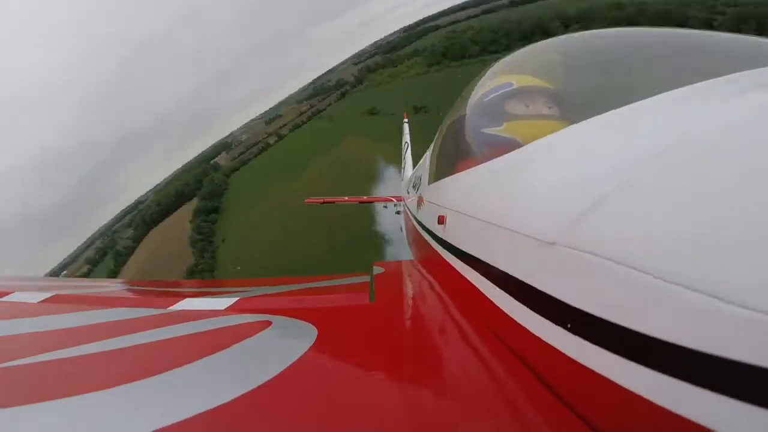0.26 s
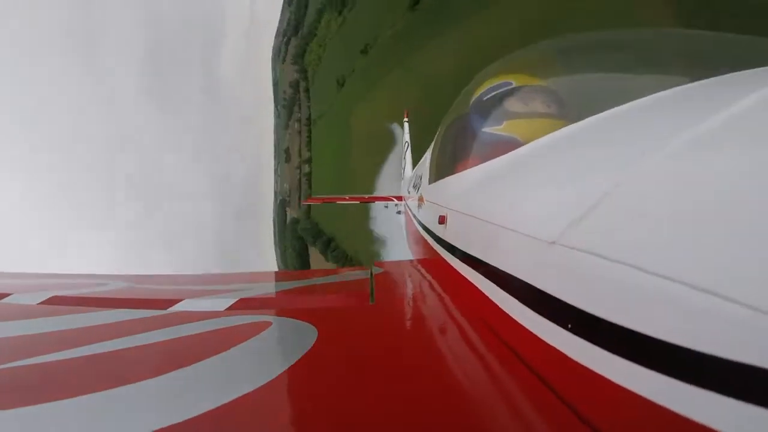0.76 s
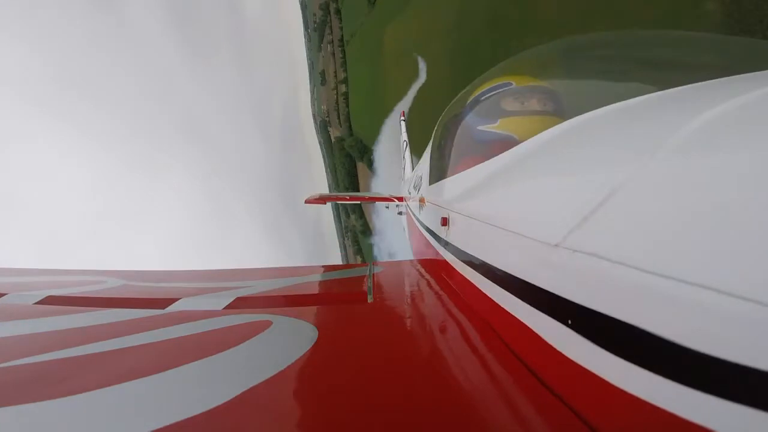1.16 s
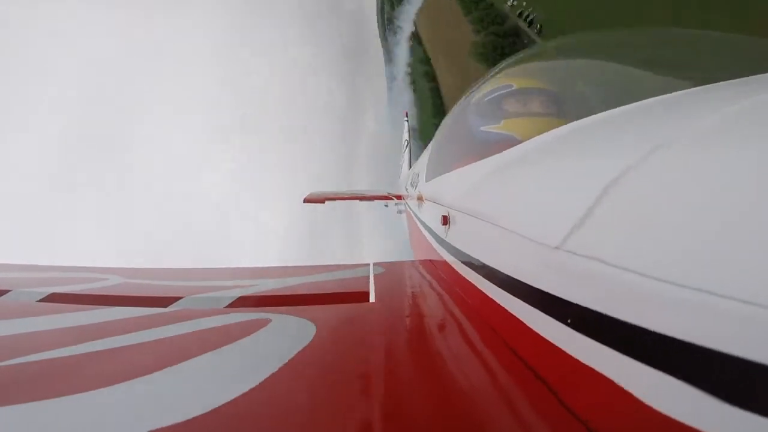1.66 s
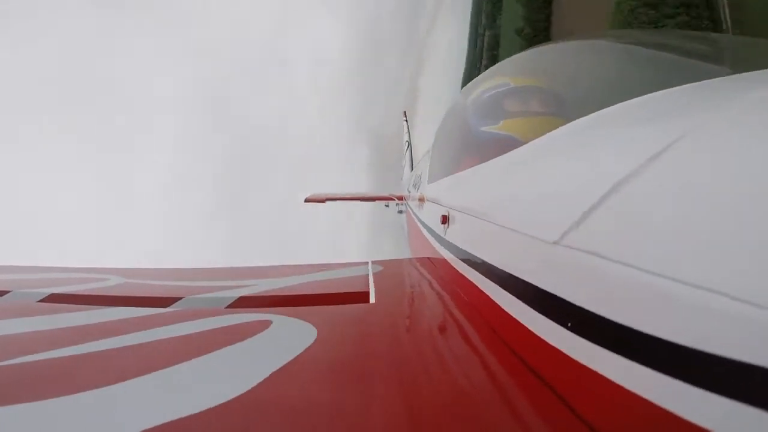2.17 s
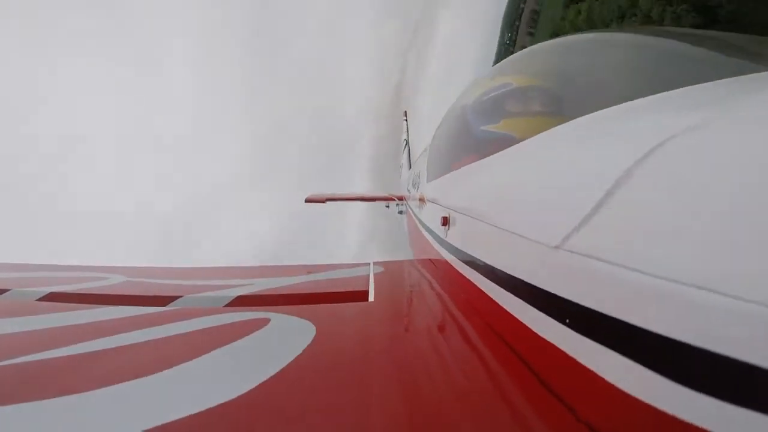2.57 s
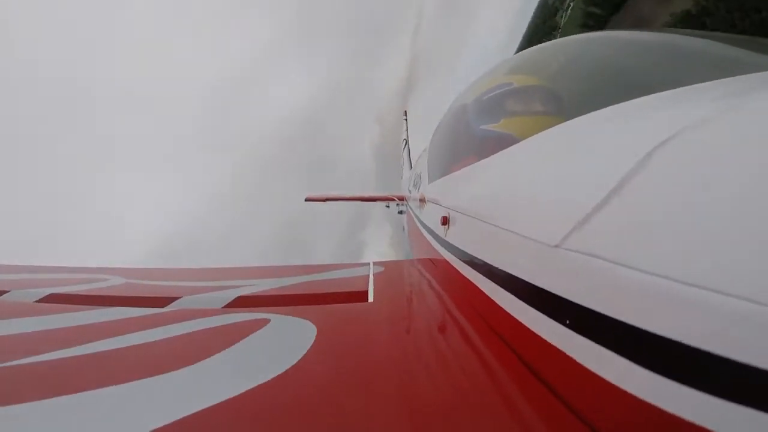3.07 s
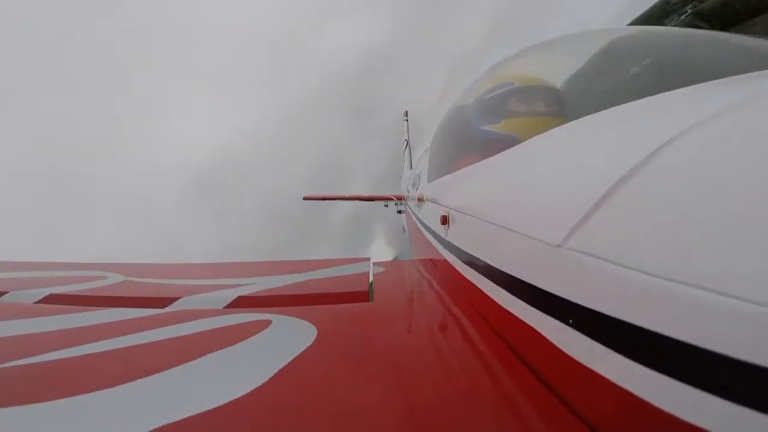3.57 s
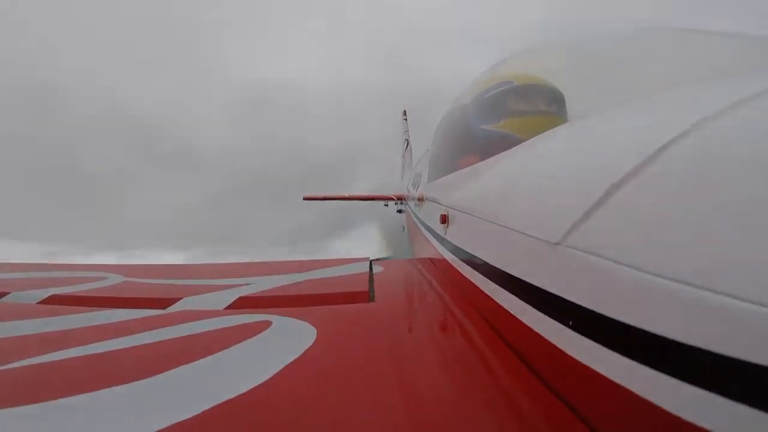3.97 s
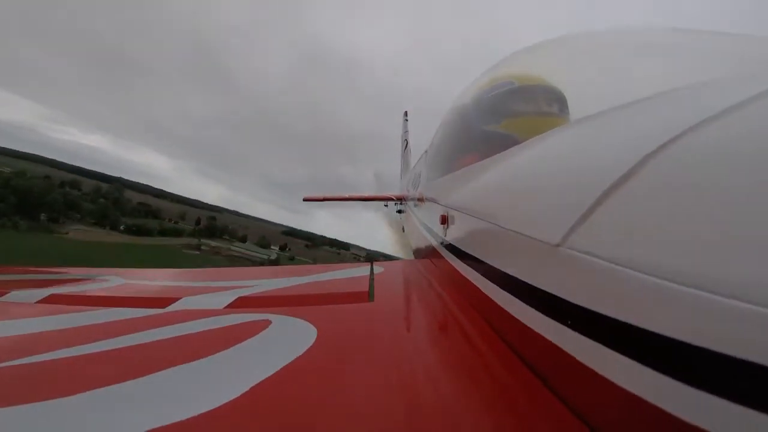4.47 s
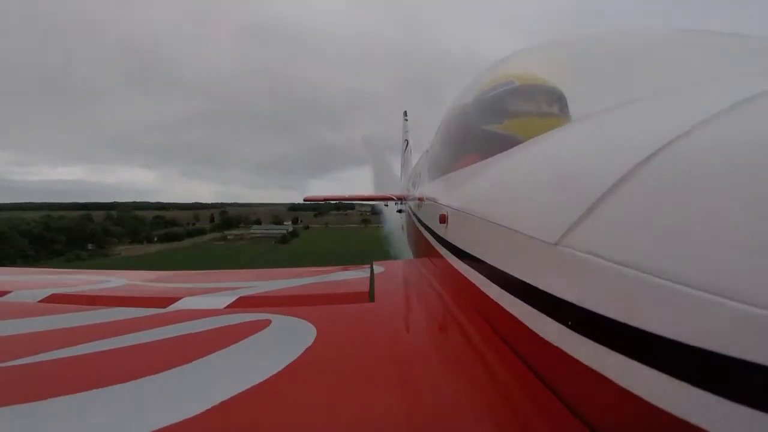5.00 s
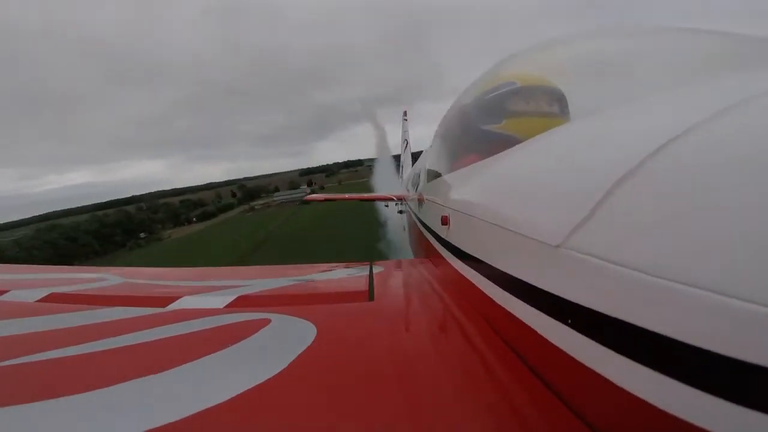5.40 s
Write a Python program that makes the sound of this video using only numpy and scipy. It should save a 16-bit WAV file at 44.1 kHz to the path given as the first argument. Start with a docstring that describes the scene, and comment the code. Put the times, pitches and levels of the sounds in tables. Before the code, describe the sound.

A small propeller plane's petrol engine drones loudly up close, rising slightly in pitch, with wind buffeting and hissing over the microphone.

```python
"""Model aeroplane, heard from the wing

A camera sits in the slipstream of a two-blade propeller on a petrol engine. Each blade throws a
pressure wave and a burst of turbulence over the housing; shaft and firing rate add odd orders.
The airstream buffets the microphone port and hisses in its cavity as speed builds. The housing ticks."""
import sys
import numpy as np
from scipy import signal
from scipy.fft import rfft, irfft, next_fast_len
from scipy.io import wavfile

SR = 44100
rng = np.random.default_rng(int(sys.argv[2]) if len(sys.argv) > 2 else 0)


def pcm_store(signal):
    """Save signal as 16-bit PCM."""
    levels = np.round(np.clip(np.atleast_2d(signal), -1, 1) * 32767)
    wavfile.write(sys.argv[1], SR, levels.astype(np.int16).T)


N = 248724


def amp(db):
    """dB to gain."""
    return 10 ** (np.asarray(db) / 20)


def unit_rms(x):
    """Scale to rms 1."""
    return x / np.sqrt(np.mean(x ** 2) + 1e-20)


def per_sample(rows):
    """Columns of a time table, one value per sample."""
    times_s, *columns = np.transpose(rows)
    return [np.interp(np.arange(N) / SR, times_s, column) for column in columns]


def drift(corner_hz):
    """Slow noise, rms 1, through a double one-pole low-pass."""
    hop, settle = 40, 2000
    pole = np.exp(-2 * np.pi * corner_hz * hop / SR)
    noise = rng.standard_normal(N // hop + settle + 2)
    slow = signal.lfilter([1], [1, -2 * pole, pole * pole], noise)[settle:]
    return np.interp(np.arange(N) / hop, np.arange(len(slow)), unit_rms(slow))


def shaped_noise(spectrum, gate=1):
    """Gated noise shaped by rows of f/Hz, level/dB; rms 1."""
    size = next_fast_len(N)
    hz, db = np.transpose(spectrum)
    log_hz = np.log(np.maximum(np.arange(size // 2 + 1) * SR / size, 1))
    gain = amp(np.interp(log_hz, np.log(hz), db))
    noise = gate * rng.standard_normal(N)
    return unit_rms(irfft(rfft(noise, size) * gain, size)[:N])


def blade_gate(shaft_rad, depth, lag_rad, imbalance_db, scatter_db):
    """One swell per blade pass, each of random strength; one blade is offset by imbalance_db."""
    passes = (shaft_rad - lag_rad) / np.pi
    index = np.floor(passes + 0.5).astype(int)
    strength = amp(scatter_db * rng.standard_normal(2000) + imbalance_db * (np.arange(2000) % 2))
    swell = np.exp(depth * (np.cos(2 * np.pi * passes) - 1))
    return strength[index - index.min()] * swell + np.exp(-2 * depth)


def housing_ticks():
    """Short rings in the housing: one-cycle attack, fast decay."""
    # t/s, level/dB, f/Hz
    ticks = [(.127, -25, 3000), (.265, -30, 2600), (.555, -28, 3000), (2.742, -16, 2200),
             (2.989, -28, 2500), (4.543, -29, 2350), (5.575, -25, 2200)]
    t60_s = 0.0075
    t = np.arange(600) / SR
    out = np.zeros(N + SR)
    for at_s, db, hz in ticks:
        envelope = np.minimum(hz * t, 1) * amp(db - 60 * t / t60_s)
        start = int(at_s * SR)
        out[start:start + len(t)] += envelope * np.sin(2 * np.pi * hz * t)
    return out[:N]


def port_hiss(shaft_rad, hiss_db):
    """Fine turbulence rings the port cavity, pulsed by the slipstream; the top grows faster with speed."""
    # cavity response: f/Hz, level/dB
    cavity_spectrum = [(1500, -8), (3000, -8), (4300, -15.5), (5000, -7.5), (5800, 0.5), (6500, -3.5),
                       (7500, -10.5), (9000, -20.5), (10000, -35), (13000, -71.5)]
    # top band: f/Hz, level/dB
    top_spectrum = [(6000, -29), (8000, 5), (9500, 6), (11000, -4.5), (12500, -27), (13500, -38)]
    gate = blade_gate(shaft_rad, depth=0.7, lag_rad=0.02, imbalance_db=1.2, scatter_db=1.3)
    cavity = amp(hiss_db + 0.24 * drift(23)) * shaped_noise(cavity_spectrum, gate)
    top_gate = blade_gate(shaft_rad, depth=0.43, lag_rad=0.02, imbalance_db=-3.5, scatter_db=0.5)
    top_db = -61.5 + 1.16 * (hiss_db - np.mean(hiss_db))
    return cavity + amp(top_db) * shaped_noise(top_spectrum, top_gate)


def buffet(buffet_db):
    """Large eddies push on the microphone in gusts; the largest rumble."""
    # gusts: f/Hz, level/dB
    gust_spectrum = [(25, -25.5), (50, 12), (100, 9), (150, 11.5), (250, 6), (400, 2), (800, -45.5)]
    # largest eddies: f/Hz, level/dB
    rumble_spectrum = [(12, -16.5), (25, 16.5), (42, 6.5), (60, 1.5), (90, 6.5), (150, -40.5)]
    # rumble envelope: t/s, level/dB
    rumble_level = [(0, -46), (.15, -33), (.6, -35), (1.0, -41.5), (1.9, -45), (2.35, -42), (3.0, -43),
                    (3.45, -44), (4.0, -40), (4.8, -36), (5.64, -36)]
    rumble_db, = per_sample(rumble_level)
    rumble = amp(rumble_db + 1.5 * drift(5)) * shaped_noise(rumble_spectrum)
    gusts = amp(buffet_db + 1.2 * drift(6.5)) * shaped_noise(gust_spectrum)
    return rumble + gusts


def blade_wake(shaft_rad, wake_db):
    """Turbulence shed by each blade hits the housing on the wave front."""
    # turbulence: f/Hz, level/dB
    wake_spectrum = [(100, -4), (250, 1), (500, -1), (800, -5), (1200, -10.5), (1600, -16), (2200, -21.5),
                     (3000, -29), (4200, -40), (5500, -49.5), (9000, -81), (12000, -110)]
    gate = blade_gate(shaft_rad, depth=0.97, lag_rad=0.032, imbalance_db=0, scatter_db=0.5)
    return amp(wake_db + 0.69 * drift(8.9)) * shaped_noise(wake_spectrum, gate)


def blade_slaps(shaft_rad, wake_db):
    """A suction-then-pressure pulse per wave front, uneven in size and time; a few hit hard."""
    # hard slaps on the housing: t/s, peak/dB
    hard_slaps = [(0.035, -16), (1.319, -9), (1.546, -12), (1.788, -11), (1.94, -16), (2.107, -12),
                  (2.237, -8), (2.505, -8.5), (2.692, -17), (2.751, -11.5), (2.791, -9), (2.819, -17),
                  (3.682, -18), (3.789, -21), (4.03, -11), (4.272, -24), (4.301, -13), (4.504, -15),
                  (5.008, -24), (5.152, -16), (5.17, -13), (5.383, -17), (5.412, -15), (5.477, -8)]
    jitter_s, front_search_s, width_s = 0.0003, 0.0015, 0.00019
    fronts = np.flatnonzero(np.diff(np.floor(shaft_rad / np.pi)))
    size, delay = rng.standard_normal((2, 2000))[:, :len(fronts)]
    arrivals = np.clip(fronts + (jitter_s * SR * delay).astype(int), 0, N - 1)
    impulses = np.zeros(N)
    impulses[arrivals] = size * amp(wake_db[fronts] - 0.1)
    for at_s, db in hard_slaps:
        nearest = np.argmin(abs(fronts - (at_s + front_search_s) * SR))
        impulses[fronts[nearest]] = amp(db)
    u = np.arange(-60, 61) / SR / width_s
    pulse = u * np.exp(0.5 - u ** 2 / 2)
    return np.convolve(impulses, pulse, "same")


def order_levels(shaft_hz):
    """Level/dB per sample of each shaft order; the airframe favours some pitches as orders sweep by."""
    # order families: t/s, blade tone/dB, odd/dB, upper even/dB
    families = [(0, -14, -29, -37.5), (.2, -17.5, -20, -32.5), (.42, -17, -25.5, -27.5),
                (.7, -17, -22.5, -24.5), (.97, -20, -28, -27.5), (1.15, -17, -20, -26),
                (1.3, -17, -21.5, -31.5), (1.5, -16.5, -27.5, -30), (1.9, -15, -23.5, -27.5),
                (2.2, -13.8, -21.5, -31.5), (2.5, -13, -24, -30), (2.78, -16, -32, -29.5),
                (3.05, -13, -26, -29), (3.3, -15.5, -28, -38), (3.65, -20, -21, -34.5),
                (4.0, -22, -23, -25.5), (4.35, -17, -21, -33.5), (4.65, -14, -20.5, -37.5),
                (5.0, -13.5, -23.5, -28.5), (5.3, -13.5, -28, -30.5), (5.64, -11.5, -30, -28.5)]
    # other orders: multiple of shaft rate, base level/dB, share of family swing/0-1
    orders = [(1, -30, 0.2), (3, -24.5, .99), (4, -22, 0.35), (5, -35.5, .8), (6, -29, .99), (7, -47.5, 0),
              (8, -35, 0.9), (9, -49.5, 0.3), (10, -38.5, 0.7), (11, -49, .1), (12, -38, 0.2),
              (13, -46.5, 0)]
    # airframe response: f/Hz, gain/dB
    airframe = [(330, -3.5), (360, -7), (385, 5), (420, 0.5), (520, -0.5), (595, 2.5), (625, -2.5),
                (700, 4), (750, 4), (785, -1.5), (840, -2), (900, 4), (965, -2.5), (1030, 0), (1120, -6.5),
                (1290, -7), (1355, 9)]
    # brief swells and dips: t/s, order, change/dB, length/s
    swells = [(0.52, 1, 1.5, 0.34), (1.05, 1, 8.5, 0.47), (2.03, 1, 8, 0.33), (2.97, 1, 7.5, 0.26),
              (0.92, 4, 6.5, 0.15), (1.23, 4, -7, 0.28), (3.64, 4, -4, 0.24), (4.55, 4, -3, 0.77),
              (1.15, 5, 4.5, 0.4), (1.9, 5, 9, 0.39), (1.05, 7, 7, .25), (1.66, 7, 11, .7),
              (2.2, 7, 11.5, 0.41), (2.15, 9, 12, .45), (2.86, 9, 10, 0.21)]
    blade_db, odd_db, even_db = per_sample(families)
    airframe_hz, airframe_db = np.transpose(airframe)
    levels_db = {2: blade_db}
    for order, base_db, share in orders:
        family_db = blade_db if order in (1, 4) else odd_db if order % 2 else even_db
        wander_db = 0.63 * drift(3.1)
        levels_db[order] = base_db + share * (family_db - family_db.mean()) + wander_db
        if order > 3:
            levels_db[order] += np.interp(order * shaft_hz, airframe_hz, airframe_db)
    t = np.arange(N) / SR
    for at_s, order, change_db, length_s in swells:
        levels_db[order] += change_db * np.exp(-(2 * (t - at_s) / length_s) ** 2)
    return levels_db


def propeller(shaft_rad, levels_db):
    """Locked shaft orders form a wave between peak and sawtooth; turbulence shakes level and phase."""
    # blade wave shape: t/s, steepness (0 peak, 1 sawtooth)
    wave_shape = [(0, 0.073), (.8, 0.38), (1.3, 0.44), (2.8, 1), (4, 0.57), (5.64, 0.48)]
    steepness, = per_sample(wave_shape)
    lean_rad = -np.pi / 2 * steepness
    out = np.zeros(N)
    for order, db in levels_db.items():
        shake_db = 0.15 * np.sqrt(order) * drift(29) + (order % 2) * 1.1 * drift(32)
        shake_rad = 0.013 * order * drift(29)
        sign = -1 if order == 1 else 1  # once-per-turn firing thump opposes the blade wave
        out += sign * amp(db + shake_db) * np.cos(order * shaft_rad + lean_rad + shake_rad)
    return np.sqrt(2) * out


def scene():
    """Propeller tone, wake and slaps over hiss, buffet and ticks; mono."""
    # shaft speed: t/s, f/Hz
    shaft_speed = [(0, 89.07), (0.1, 85.08), (0.4, 87.58), (0.65, 84.73), (0.78, 85.27), (0.9, 90.14),
                   (1.1, 94.92), (1.3, 96.03), (2.1, 99.19), (2.5, 101.49), (3.2, 101.8), (3.8, 103.63),
                   (4.2, 103.26), (5, 103.36), (5.4, 104.36), (5.64, 104.09)]
    # air over the housing: t/s, wake/dB, port hiss/dB, buffet/dB
    airflow = [(0, -23, -39.5, -25), (.15, -23.5, -42.5, -30), (.5, -24, -42.5, -26.5),
               (.9, -24, -44, -23.5), (1.1, -23, -42, -27.5), (1.3, -21.5, -45, -21),
               (1.73, -20.5, -46, -31.5), (1.95, -20.5, -43.5, -31), (2.3, -19.5, -42, -28),
               (2.5, -22.5, -42.5, -25.5), (2.95, -19.5, -41, -29.5), (3.2, -23.5, -40, -28.5),
               (3.45, -26, -39.5, -29), (3.85, -23.5, -36.5, -28), (4.5, -23.5, -34, -26),
               (4.85, -21.5, -33, -23.5), (5.15, -20.5, -32.5, -23), (5.64, -20, -32, -20)]
    shaft_hz, = per_sample(shaft_speed)
    wake_db, hiss_db, buffet_db = per_sample(airflow)
    shaft_rad = -1.75 + 2 * np.pi * np.cumsum(shaft_hz) / SR  # a blade front every half turn
    tone = propeller(shaft_rad, order_levels(shaft_hz))
    blades = tone + blade_wake(shaft_rad, wake_db) + blade_slaps(shaft_rad, wake_db)
    return (blades + port_hiss(shaft_rad, hiss_db) + buffet(buffet_db) + housing_ticks())[None, :]


def record(dry):
    """Soft clip, then steep low-pass."""
    cutoff_hz = 13500
    soft = 1.272 * np.tanh(dry / 1.223)
    return signal.sosfilt(signal.cheby2(10, 60, cutoff_hz, fs=SR, output="sos"), soft)


dry = scene()
out = record(dry)
pcm_store(out)
```